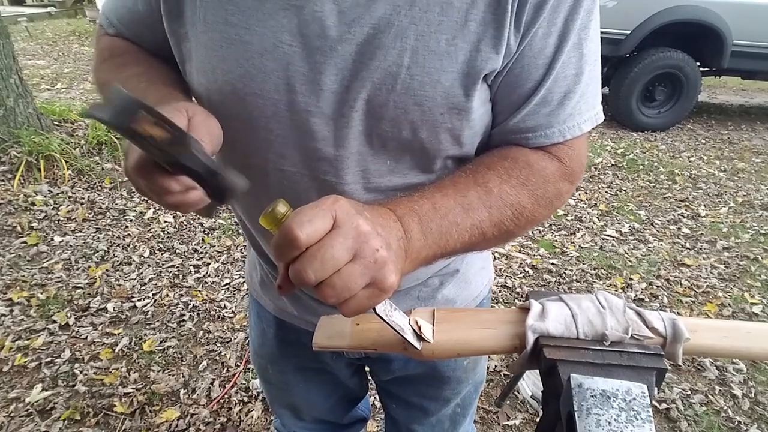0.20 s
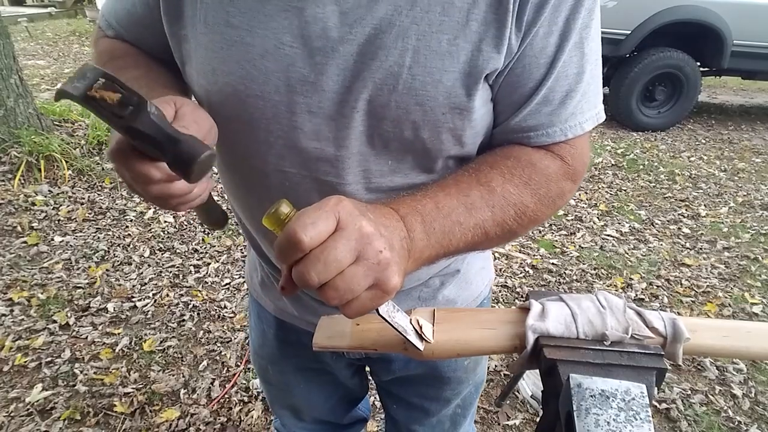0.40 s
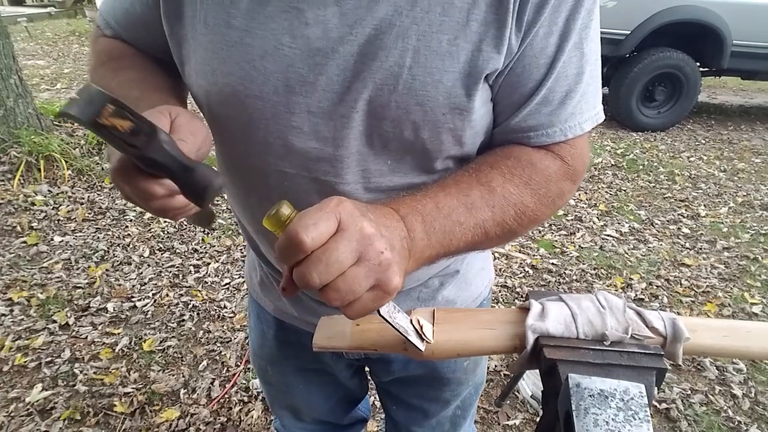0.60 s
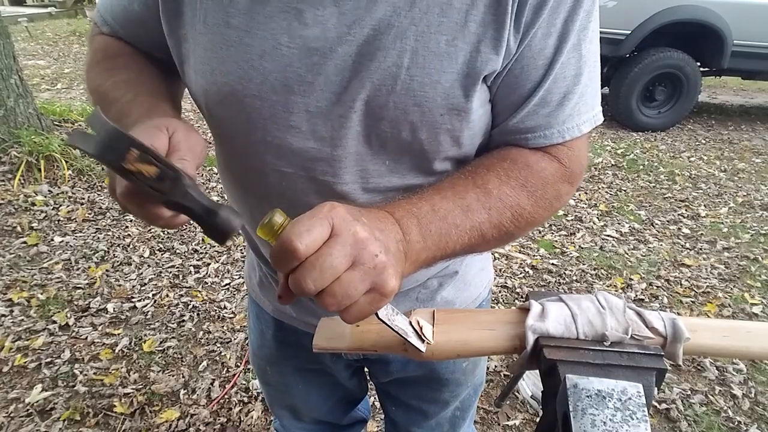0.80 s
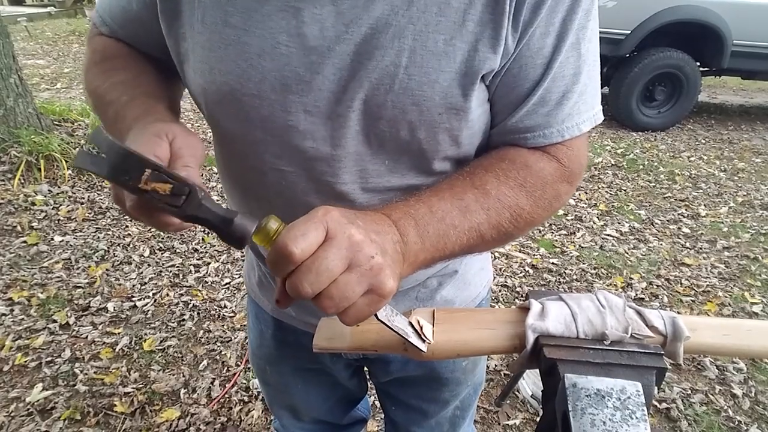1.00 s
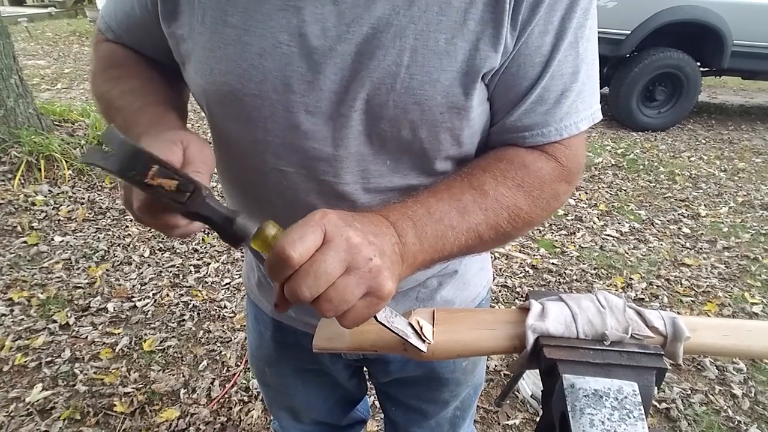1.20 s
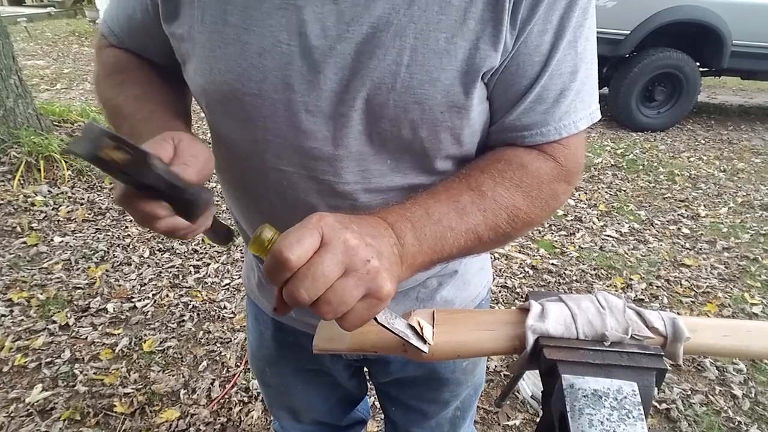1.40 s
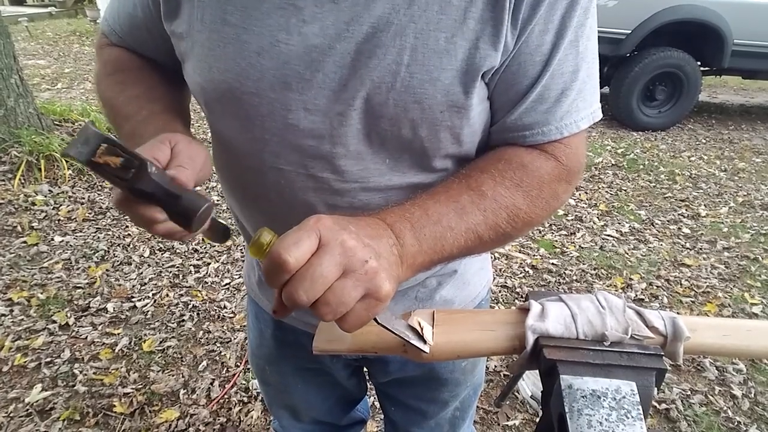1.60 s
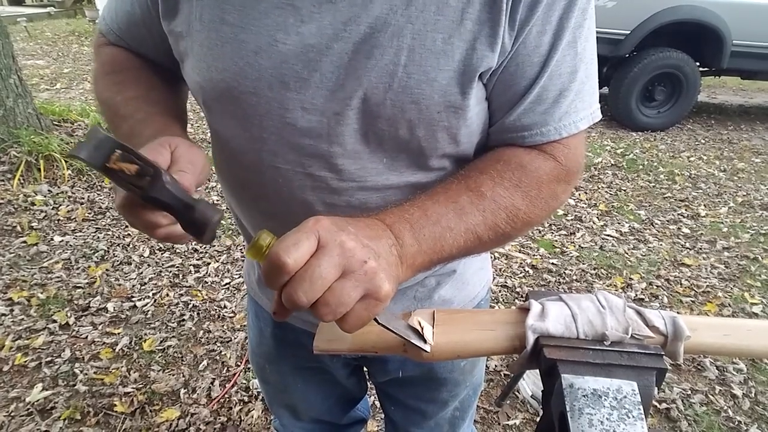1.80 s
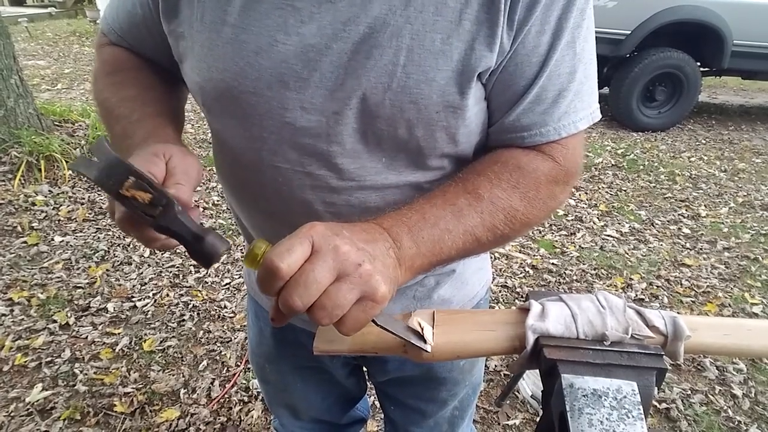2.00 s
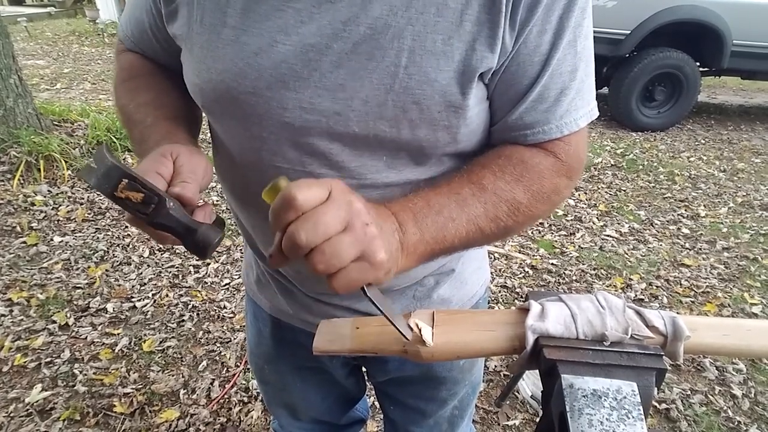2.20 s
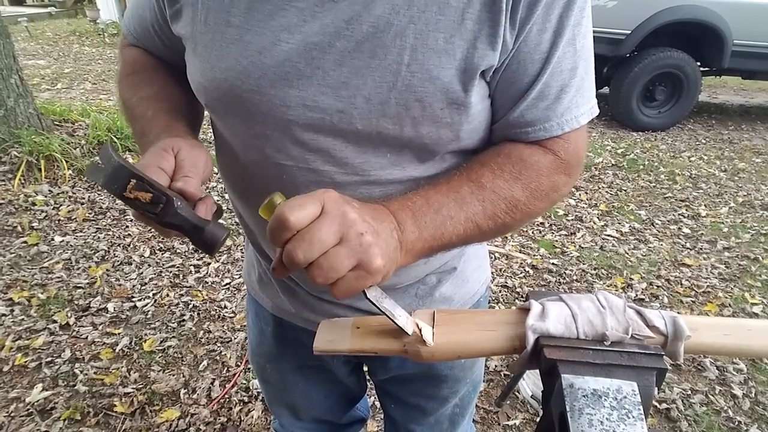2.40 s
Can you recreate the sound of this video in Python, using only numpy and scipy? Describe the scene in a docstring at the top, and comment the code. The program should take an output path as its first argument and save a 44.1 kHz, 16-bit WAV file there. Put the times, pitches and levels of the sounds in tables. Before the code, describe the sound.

A hammer strikes a chisel into clamped wood, eight sharp rattling knocks, about four a second, outdoors

```python
"""Hammer and chisel at a vise

A hammer drives a chisel into a wooden handle clamped in a vise, about four blows a second, close by in an open yard.
Each blow excites noise bursts and damped modes of the wood, kicks the handle against the vise, shakes the stand
and, on the rebound, rattles the steel. The vise settles once with a dull bump, and a light knock follows
as the chisel is lifted out. A bird peeps in short falling sines over faint outdoor air, made of shaped noise.
"""
import sys
import numpy as np
from scipy import signal
from scipy.fft import rfft, irfft, next_fast_len
from scipy.io import wavfile
from scipy.ndimage import map_coordinates

SR = 44100
rng = np.random.default_rng(int(sys.argv[2]) if len(sys.argv) > 2 else 0)


def dump(signal):
    """Clip the signal to [-1, 1] and save it as 16-bit WAV at the path in sys.argv[1]."""
    limited = np.clip(np.atleast_2d(signal).T, -1, 1)
    pcm = np.round(limited * 32767).astype(np.int16)
    wavfile.write(sys.argv[1], SR, pcm)


N = 110250  # samples, 2.5 s

# Hammer blows; the first falls just before the start, so only its tail sounds:
# start_s, strength_db, kick_db, rebound_after_s, rattle_db, buzz_db, buzz_hold_s, chisel_ring_db, bright_ring_db
BLOWS = [(-.036, -14, -3, .03, -2.5, -14, 0.005, -21, -19),
         (.2200, -2, -5, 0.022, 1.5, -10.5, 0.019, -8, -12),
         (.4741, 0.5, -0.5, 0.028, 4, 0, .026, 1.5, -7.5),
         (0.7093, 2, 0.5, 0.035, 3.5, -2.5, 0.027, 7.5, 3.5),
         (.9491, 0.5, 1, 0.028, 0, 2.5, 0.021, -4, 5.5), (1.1992, -1, -0.5, .028, -2, 0, 0.011, 2, -13),
         (1.4299, -1, -2, .029, -1, -3, .012, 4.5, -8.5),
         (1.6587, -0.5, -6.5, 0.026, 1.5, -1, 0.013, 6.5, -14),
         (1.8714, -1.5, 1.5, 0.027, 2.5, 0, 0.013, 11, -26.5)]
# Bird peeps: start_s, length_s, mid_pitch_hz, level_db
PEEPS = [(.108, 0.035, 4110, -52), (0.167, 0.043, 4170, -48), (0.638, 0.022, 5640, -59),
         (0.658, 0.015, 5270, -55), (0.863, 0.042, 4140, -55), (0.934, 0.013, 4040, -52.5),
         (1.703, 0.036, 4180, -48), (2.428, 0.03, 4160, -52), (2.488, 0.031, 4180, -50)]

# Damped modes of each body: frequency_hz, level_db, t60_s
WOOD_MODES = [(226.6, -24, 0.028), (465, -20.5, 0.13), (553, -39, 0.053), (899.7, -10.5, 0.1),
              (1037.5, -9, 0.045), (1495, -18.5, 0.066), (1717, -22, .035), (1940, -8, 0.021),
              (2445, -28.5, 0.085), (2680, -18.5, 0.059), (2930, -24.5, 0.073), (3400, -55.5, 0.0069),
              (3915, -16, 0.023), (5870, -19.5, 0.02)]
STAND_MODES = [(59.4, -38, 0.6), (75, -31.5, 0.66), (107.1, -19, 0.39), (179.8, -23.5, 0.33),
               (239.5, -20.5, 0.15), (285, -17, 0.14), (334, -27, 0.25)]
VISE_MODES = [(292.8, -16, .13), (735, -20, 0.075), (883, -21.5, 0.092), (1494, -24, 0.045),
              (1580, -25, 0.052), (2700, -34.5, 0.039), (3040, -27, .07), (3090, -33, 0.065),
              (4010, -35, 0.055)]
BUZZ_MODES = [(2411, -23.5, .04), (2457, -26, 0.017), (2580, -33, 0.022)]  # steel chattering on the rebound
BRIGHT_MODES = [(5250, -43, 0.076), (6220, -47.5, .15), (6800, -40, 0.13), (7400, -49, 0.047),
                (7980, -47.5, 0.13), (8920, -43.5, .09), (9580, -57.5, .08), (11380, -45.5, .16),
                (13060, -55.5, .07), (14290, -53, .08), (15200, -56.5, .07)]  # high ringing on the rebound
CHISEL_MODES = [(3474, -41.5, 0.42)]
LOOSE_MODES = [(183, -36, 0.23), (279.3, -27.5, 0.13), (316.6, -28, 0.22), (496, -36.5, 0.091),
               (732, -48, 0.18), (900, -44.5, 0.14), (1060, -18, 0.04), (1144, -26, 0.046),
               (1590, -28, 0.022), (2530, -32.5, 0.025), (2780, -39, .025)]  # knock of the lifted chisel

# Noise spectra: frequency_hz, density_db_per_hz (relative); noise decays: frequency_hz, t60_s
# Hard snap of hammer on chisel
SNAP_COLOUR = [(200, 7), (1000, -17), (2000, 1), (3900, 1.5), (4900, -23), (5900, -6.5), (7500, -17),
               (9500, -28.5), (12000, -41), (16000, -37)]
SNAP_T60 = [(1000, 0.03), (12000, 0.016)]
# Crack of the wood
CRACK_COLOUR = [(60, -19), (300, -4.5), (1000, -4), (2000, 4.5), (3900, -16), (4900, -4.5), (5900, -27),
                (7500, -15), (9500, -23.5), (12000, -16.5), (16000, -19)]
CRACK_T60 = [(200, 0.03), (2000, 0.032), (12000, 0.03)]
# Fibres splitting under the edge
SPLIT_COLOUR = [(60, -24.5), (250, -2), (900, -2.5), (1500, -9), (2600, -15), (4000, -20.5), (6500, -27.5),
                (10000, -32), (16000, -40)]
SPLIT_T60 = [(100, 0.32), (500, 0.16), (3000, 0.17), (12000, .11)]
# Diffuse sound in the yard
YARD_COLOUR = [(35, -13.5), (70, -3.5), (270, -8.5), (450, -18), (900, -16.5), (1500, -25.5), (2600, -27.5),
               (5000, -43.5), (9000, -43), (16000, -44)]
YARD_T60 = [(80, 0.7), (500, 0.28), (3000, 0.41), (12000, 0.19)]
# Jaw snapping shut (it shares the colour of the snap)
CLACK_T60 = [(1000, 0.017), (12000, 0.011)]
# Clatter of the slack jaw
RATTLE_COLOUR = [(60, -1), (280, 10.5), (550, -2.5), (800, -15), (1100, 0.5), (1550, -5.5), (2050, -13.5),
                 (2600, -3.5), (4000, -23.5), (5200, -32), (7000, -34.5), (10000, -43.5), (16000, -44.5)]
RATTLE_T60 = [(200, 0.095), (1500, 0.05), (4000, 0.073), (12000, 0.065)]
# Dull bump of the settling vise
BUMP_COLOUR = [(50, -27), (150, -5.5), (290, 11.5), (500, -15.5), (900, -8), (1500, -17), (2000, -39),
               (2420, -13), (3000, -36.5), (6000, -53), (16000, -60)]
BUMP_T60 = [(280, 0.11), (1000, 0.058), (2400, 0.062)]
# Tick of the chisel leaving the wood
TICK_COLOUR = [(50, -36), (150, -19), (400, 5.5), (1300, 9.5), (2000, -4.5), (2800, 6.5), (4500, -12.5),
               (8000, -25), (16000, -33)]
TICK_T60 = [(200, 0.17), (2000, 0.039), (10000, 0.035)]
# Outdoor air, steady
AIR_COLOUR = [(25, -3), (60, 1), (150, 2.5), (230, -12.5), (340, -6), (600, -12), (1000, -20), (2600, -24),
              (3600, -27.5), (4800, -30.5), (6000, -28), (7000, -38.5), (10000, -43), (14000, -35.5),
              (16000, -36)]

# Left-right likeness of noise: frequency_hz, correlation (1 = identical)
LIKENESS = [(100, 1), (500, 0.88), (1000, 0.28), (2500, 0.17), (12000, 0.34)]
# Level difference between microphone ports: frequency_hz, left_minus_right_db
PORT_LEVEL = [(50, 2.5), (270, 2.6), (450, 4.5), (740, 1), (1200, 0), (2300, 2), (3300, 0.5), (5500, -2),
              (9000, -5.5), (13000, -4.5)]
# Phase difference between microphone ports: frequency_hz, left_lead_rad
PORT_PHASE = [(100, 0.12), (900, -0.48), (1400, 0.52), (1900, -0.68), (2450, 0.83), (3000, 1.94),
              (4000, 1.25), (5500, -0.53), (9000, 1.2), (16000, 1.2)]

SNAP_DB, CRACK_DB, SPLIT_DB, YARD_DB = -12, -13, -14.5, -27
CLACK_DB, RATTLE_DB, TICK_DB, AIR_DB = -19.5, -13, -31, -50.5
KICK_S, KICK_WIDTH_S, KICK_HZ, KICK_DB = 0.01519, 0.0021, 249, -2.5  # the handle lurches in its padded jaws
STAND_LAG_S = 0.01352
SETTLE_S, SETTLE_DB, SETTLE_RISE_S = 1.065, -22.5, 0.0022  # the vise rocks back once
KNOCK_S, KNOCK_DB, KNOCK_RISE_S = 2.3241, 4, 0.00098  # the chisel is lifted out
RING_S = 0.7  # longest time any contact sounds
SCATTER_DB = 1  # random spread of mode levels
GRAINS_PER_S = 900
MIC_LOW_HZ, TOP_HZ = 42.25, 16300


def amp(db):
    """Level law: decibels to an amplitude ratio."""
    return 10 ** (np.asarray(db) / 20)


def unit(x):
    """Normalization to an rms of 1."""
    return x / np.sqrt(np.mean(x ** 2) + 1e-20)


def along(points, hz):
    """Interpolation of (frequency, value) points on a logarithmic frequency axis."""
    f, v = np.transpose(points)
    return np.interp(np.log(hz + 1), np.log(f + 1), v)


def clock():
    """Time in seconds since a contact."""
    return np.arange(round(RING_S * SR)) / SR


def add(out, start_s, sound):
    """Superposition: mix a sound in at its time, trimmed to the scene."""
    i = round(start_s * SR)
    first = max(i, 0)
    part = sound[..., max(-i, 0):N - i]
    out[:, first:first + part.shape[-1]] += part


def noise(colour, size):
    """Partly coherent stereo noise: the mid-side balance sets the left-right correlation at each frequency."""
    hz = np.fft.rfftfreq(size, 1 / SR)
    turn = np.arccos(np.clip(along(LIKENESS, hz), 0, 1)) / 2
    spectra = rfft(rng.standard_normal((2, size))) * amp(along(colour, hz))
    mid, side = irfft(spectra * [np.cos(turn), np.sin(turn)], size)
    return unit(np.array([mid + side, mid - side]))


def burst(colour, decay, rise, grain_db, count=7):
    """Frequency-dependent damping: grainy noise whose bands each die at their own rate."""
    t = clock()
    knots = t * GRAINS_PER_S
    wander = map_coordinates(rng.standard_normal(int(knots[-1]) + 4), [knots])
    grain = unit(amp(grain_db * wander))
    spectrum = rfft(noise(colour, len(t)))
    hz = np.fft.rfftfreq(len(t), 1 / SR)
    centres = np.geomspace(80, 14000, count)
    bands = 0
    # overlapping bands whose weights sum to 1 at every frequency
    for centre, share in zip(centres, np.eye(count)):
        band = irfft(spectrum * along(np.c_[centres, share], hz), len(t))
        bands = bands + band * amp(-60 * t / along(decay, centre))
    return bands * grain * (1 - np.exp(-t / rise))


def ring(modes, rise, detune, hold=0):
    """Modal superposition: damped sines of alternating sign, varied at each contact; chattering holds them up."""
    t = clock()
    free = np.maximum(t - hold, 0)  # damping starts after the hold
    chance = rng.standard_normal((len(modes), 2))
    tones = 0
    for k, ((hz, db, t60), (level_draw, pitch_draw)) in enumerate(zip(modes, chance)):
        envelope = amp(db + SCATTER_DB * level_draw - 60 * free / t60)
        tone = np.sin(2 * np.pi * hz * (1 + detune * pitch_draw) * t)
        tones = tones + (-1) ** k * envelope * tone
    return tones * (1 - np.exp(-t / rise))


def strike():
    """Impact excitation: a hard snap, the crack and ring of the wood, and fibres splitting under the edge."""
    snap = amp(SNAP_DB) * burst(SNAP_COLOUR, SNAP_T60, rise=0.000051, grain_db=4)
    crack = amp(CRACK_DB) * burst(CRACK_COLOUR, CRACK_T60, rise=0.00089, grain_db=2)
    fibres = amp(SPLIT_DB) * burst(SPLIT_COLOUR, SPLIT_T60, rise=0.0035, grain_db=1.5)
    return snap + crack + fibres + ring(WOOD_MODES, rise=0.0013, detune=0.0058)


def chisel_ring():
    """Free vibration: the struck chisel rings in one high mode."""
    return ring(CHISEL_MODES, rise=0.001, detune=0)


def yard():
    """Diffuse field: sound out in the yard swells slowly after the blow, then decays."""
    return amp(YARD_DB) * burst(YARD_COLOUR, YARD_T60, rise=0.067, grain_db=0.5)


def kick():
    """Momentum transfer: one short, deep lurch of the handle, a cosine under a Gaussian pulse."""
    t = clock() - KICK_S
    pulse = np.exp(-(t / KICK_WIDTH_S) ** 2 / 2)
    return amp(KICK_DB) * pulse * np.cos(2 * np.pi * KICK_HZ * t)


def stand():
    """Structural transmission: the shaken stand answers in low, slowly damped modes."""
    return ring(STAND_MODES, rise=0.0034, detune=0.0072)


def rattle():
    """Contact with play: the slack jaw of the vise clacks shut, clatters and rings on the rebound."""
    clack = amp(CLACK_DB) * burst(SNAP_COLOUR, CLACK_T60, rise=0.00036, grain_db=2)
    clatter = amp(RATTLE_DB) * burst(RATTLE_COLOUR, RATTLE_T60, rise=0.0015, grain_db=4)
    return clack + clatter + ring(VISE_MODES, rise=0.001, detune=0.006)


def buzz(hold_s):
    """Sustained excitation: chattering keeps close modes up before they decay."""
    return ring(BUZZ_MODES, rise=0.0019, detune=0.007, hold=hold_s)


def bright_ring():
    """Light damping: high modes ring on after the rebound."""
    return ring(BRIGHT_MODES, rise=0.0015, detune=0.0004)


def hammering():
    """Propagation of a blow: from chisel through handle, vise and stand, and out into the yard."""
    out = np.zeros((2, N))
    for s, db, kick_db, rebound_s, rattle_db, buzz_db, hold_s, chisel_db, bright_db in BLOWS:
        add(out, s, amp(db) * strike())
        add(out, s, amp(chisel_db) * chisel_ring())
        add(out, s, amp(db) * yard())
        add(out, s, amp(kick_db) * kick())
        add(out, s + STAND_LAG_S, amp(db) * stand())
        add(out, s + rebound_s, amp(rattle_db) * rattle())
        add(out, s + rebound_s, amp(buzz_db) * buzz(hold_s))
        add(out, s + rebound_s, amp(bright_db) * bright_ring())
    return out


def air():
    """Stationary random sound: faint outdoor air of fixed spectrum."""
    return amp(AIR_DB) * noise(AIR_COLOUR, N)


def bird(sag_hz_per_s=3000):
    """Frequency modulation: thin peeps whose phase is the integral of a falling pitch."""
    out, t = np.zeros((2, N)), clock()
    for s, length, hz, db in PEEPS:
        pitch = hz - sag_hz_per_s * (t - length / 2)
        envelope = np.sin(np.pi * np.minimum(t / length, 1))
        add(out, s, amp(db) * envelope * np.sin(2 * np.pi * np.cumsum(pitch) / SR))
    return out


def settling():
    """Soft impact: the vise rocks back once with a dull bump."""
    out = np.zeros((2, N))
    add(out, SETTLE_S, amp(SETTLE_DB) * burst(BUMP_COLOUR, BUMP_T60, SETTLE_RISE_S, grain_db=2.5))
    return out


def knock():
    """Light impact: the loose chisel knocks on the wood, a noise tick over damped modes."""
    out = np.zeros((2, N))
    tick = amp(TICK_DB) * burst(TICK_COLOUR, TICK_T60, KNOCK_RISE_S, grain_db=2.5)
    modes = ring(LOOSE_MODES, KNOCK_RISE_S, detune=0.005)
    add(out, KNOCK_S, amp(KNOCK_DB) * (modes + tick))
    return out


def scene():
    """Superposition of the work, the open air and the bird."""
    return hammering() + air() + bird() + settling() + knock()


def record(dry):
    """Two-port reception: level and phase differ between ports, deep bass is shed, peaks round off, the top is cut."""
    size = next_fast_len(N + SR // 2)
    hz = np.fft.rfftfreq(size, 1 / SR)
    dry = signal.sosfilt(signal.butter(2, MIC_LOW_HZ, "high", fs=SR, output="sos"), dry)
    # each port takes half of the difference
    left = amp(along(PORT_LEVEL, hz) / 2) * np.exp(1j * along(PORT_PHASE, hz) / 2)
    ports = irfft(rfft(dry, size) * [left, 1 / left], size)
    rounded = ports / (1 + np.abs(ports) ** 6) ** (1 / 6)
    top_cut = 1 / (1 + (hz / TOP_HZ) ** 120)
    return irfft(rfft(rounded) * top_cut, size)[:, :N]


dry = scene()
out = record(dry)
dump(out)
```